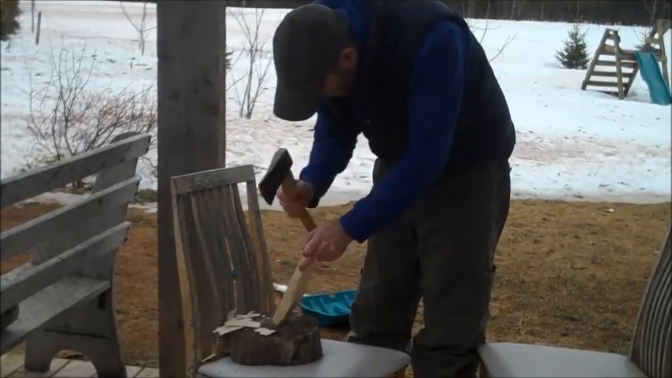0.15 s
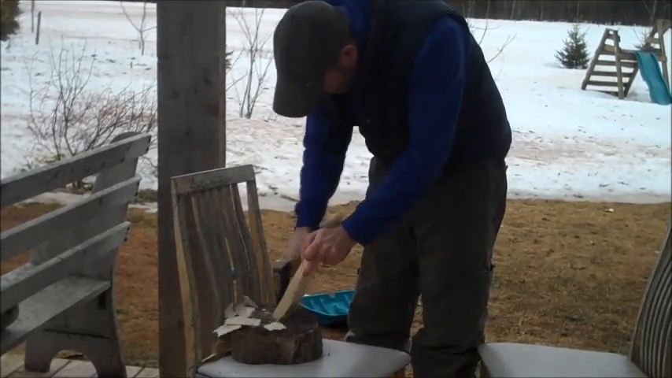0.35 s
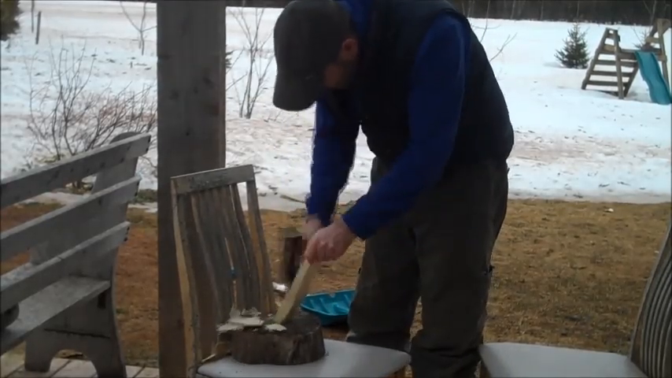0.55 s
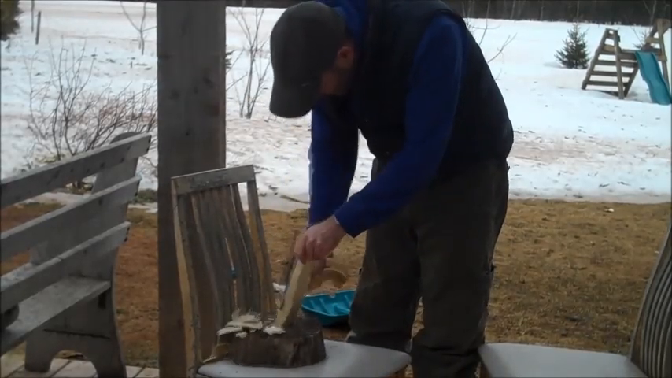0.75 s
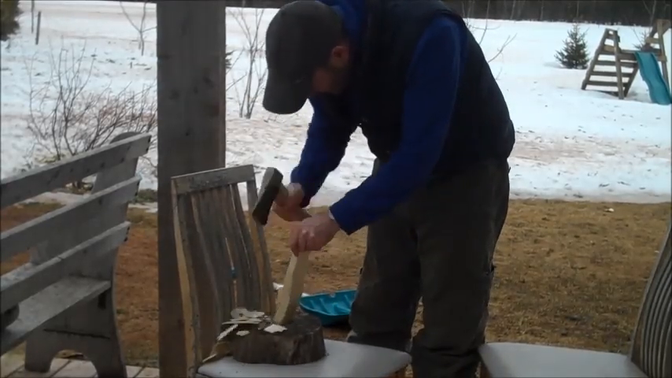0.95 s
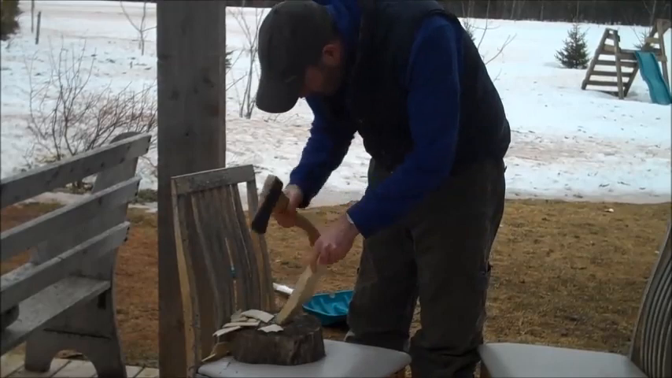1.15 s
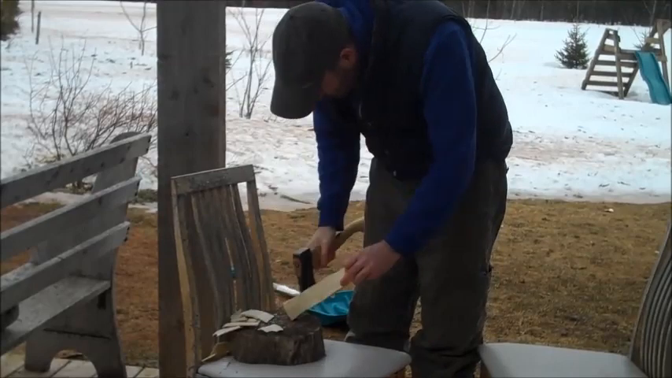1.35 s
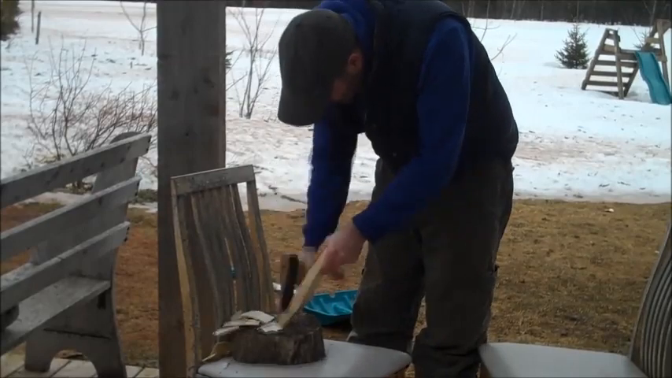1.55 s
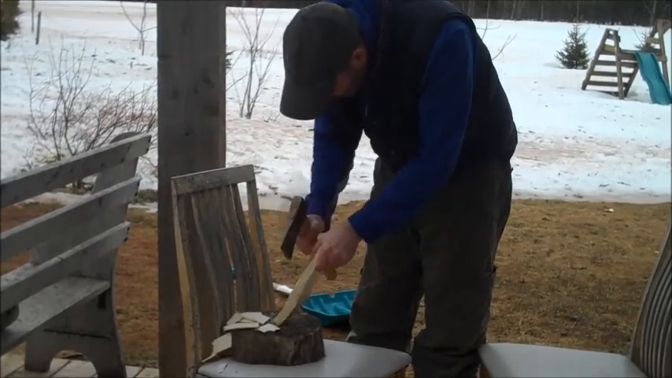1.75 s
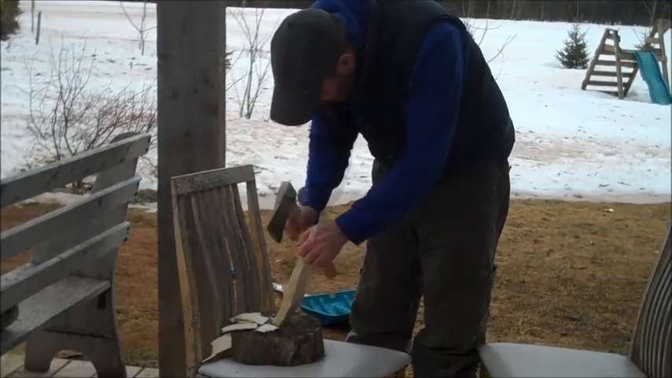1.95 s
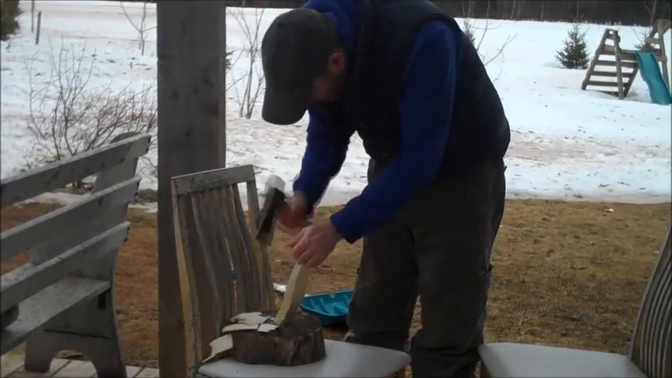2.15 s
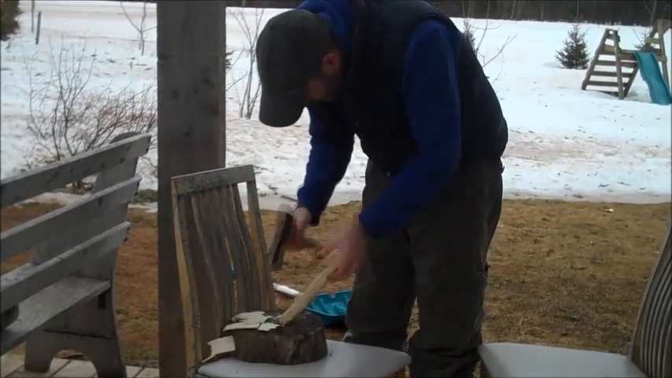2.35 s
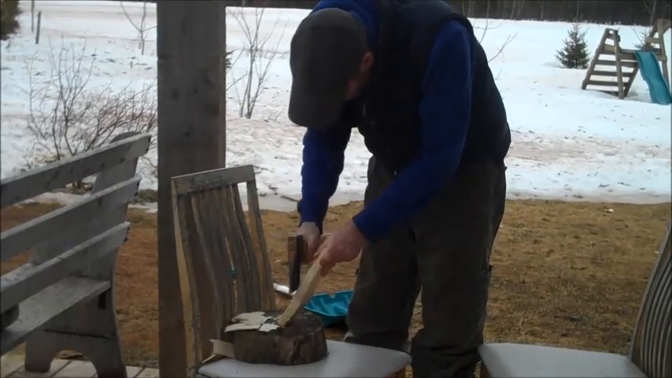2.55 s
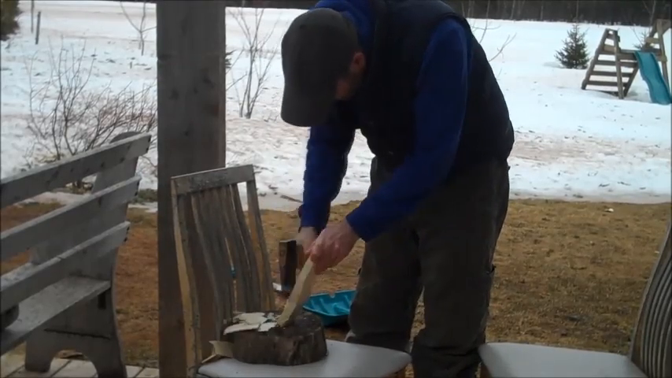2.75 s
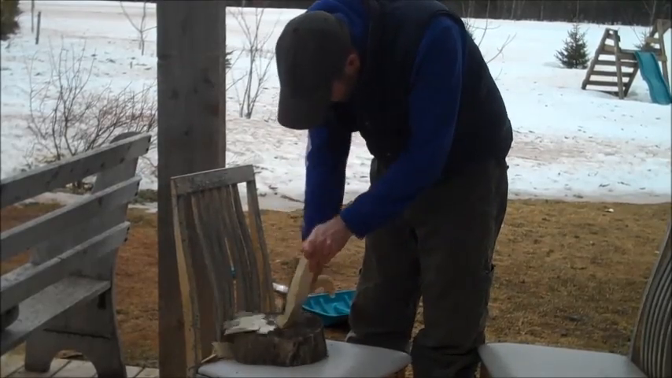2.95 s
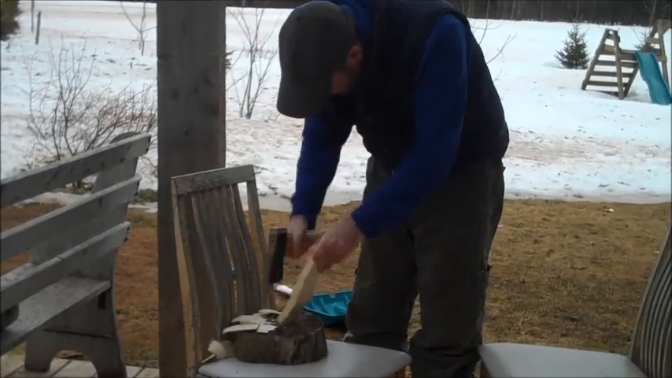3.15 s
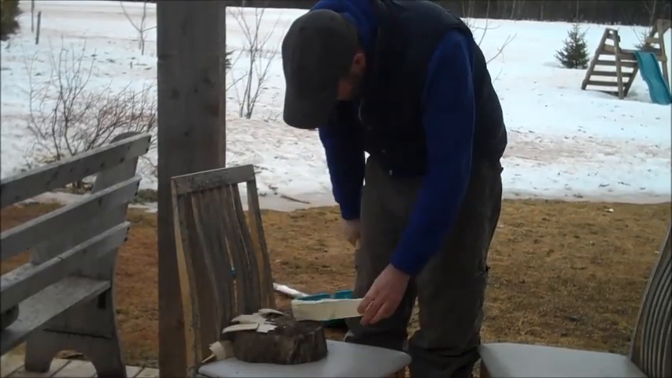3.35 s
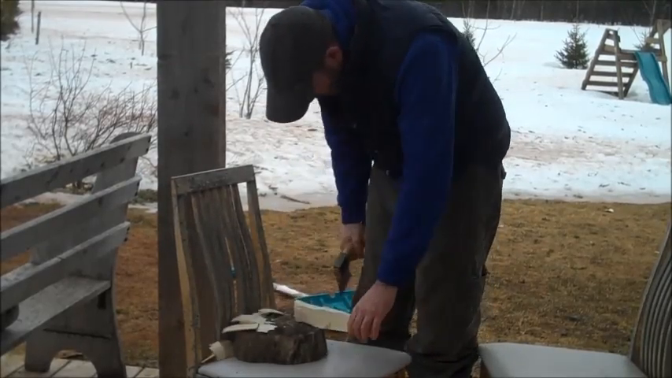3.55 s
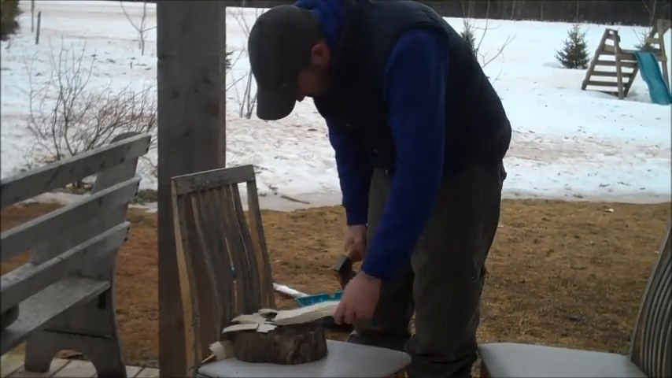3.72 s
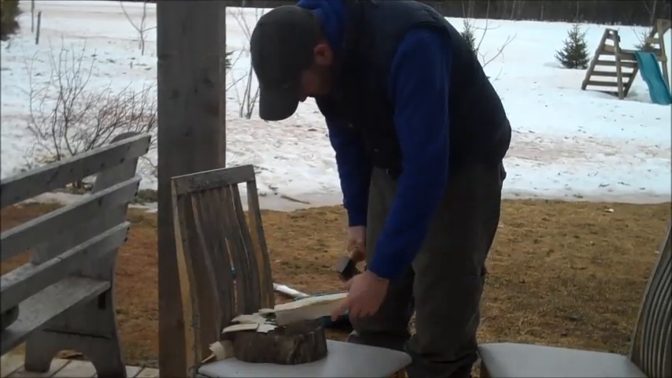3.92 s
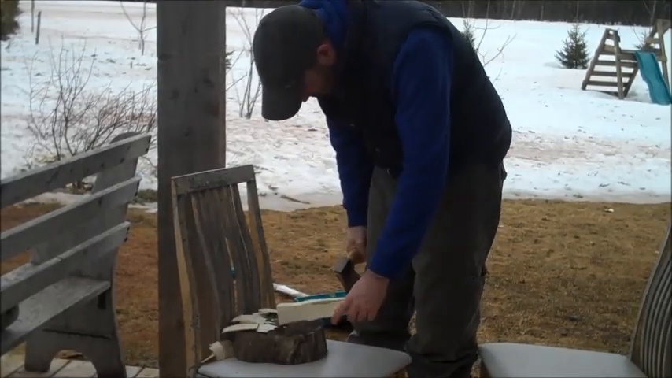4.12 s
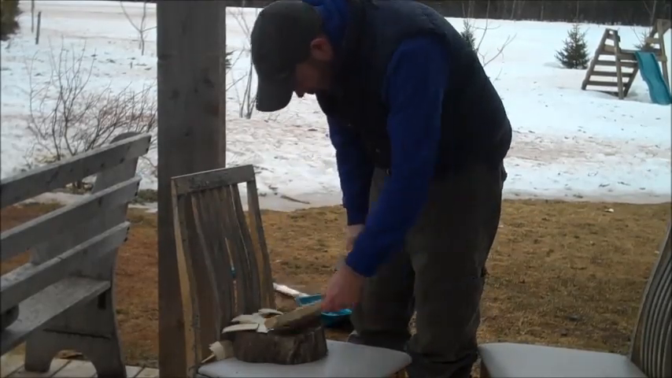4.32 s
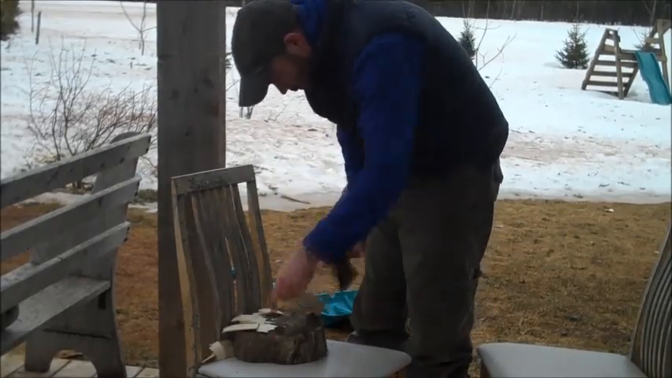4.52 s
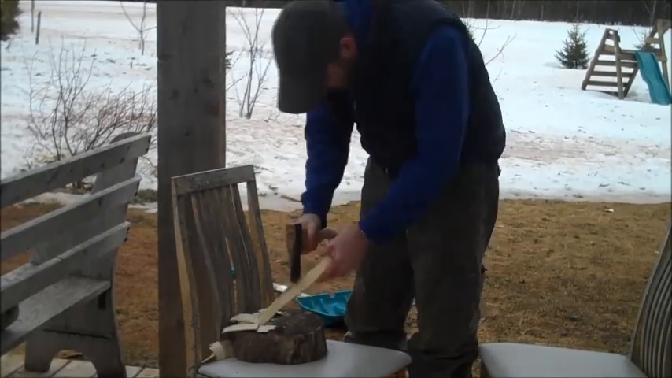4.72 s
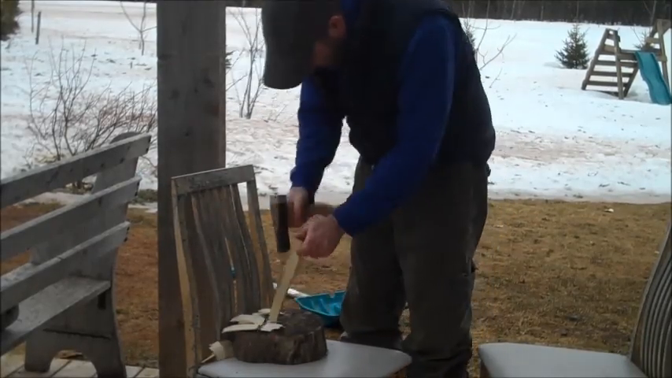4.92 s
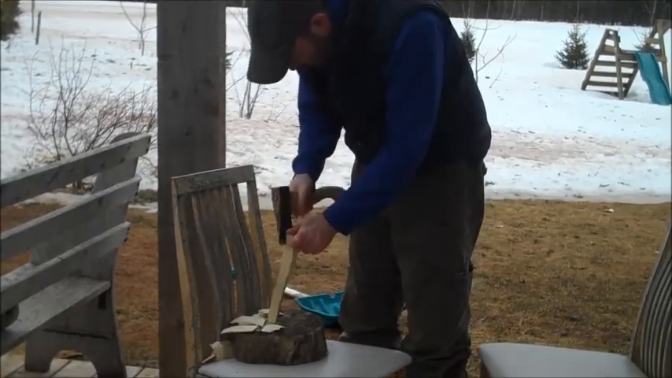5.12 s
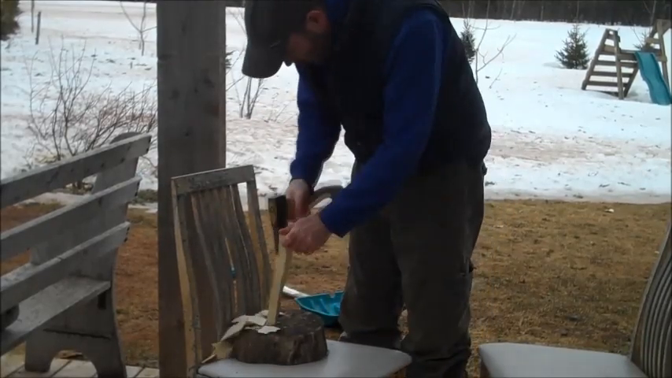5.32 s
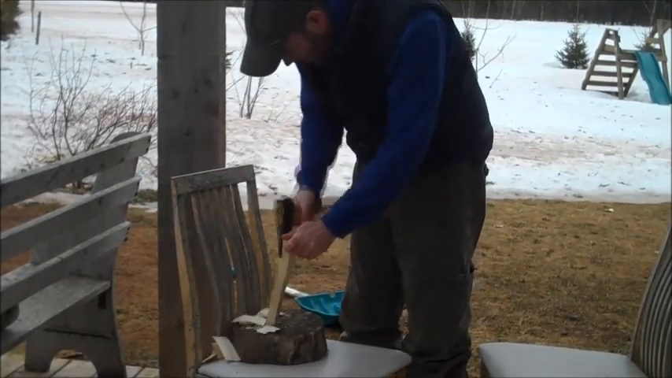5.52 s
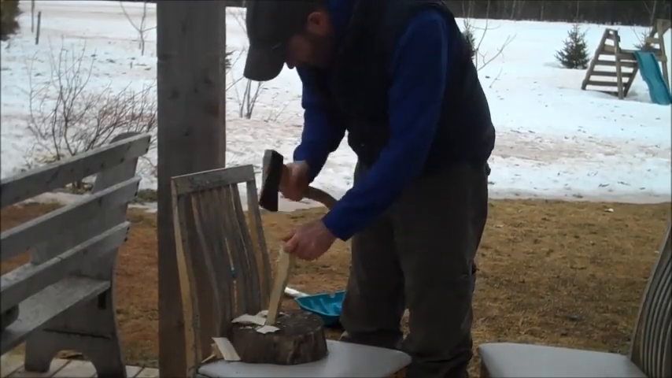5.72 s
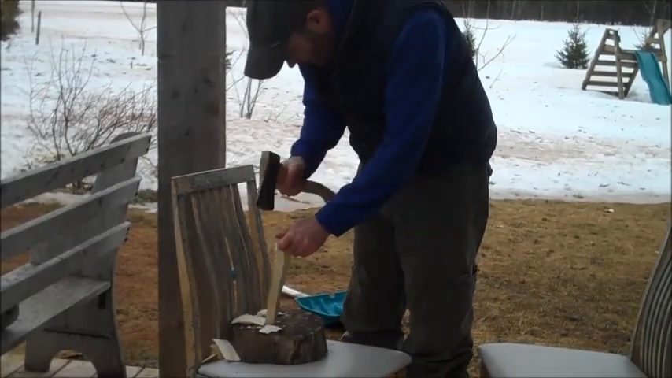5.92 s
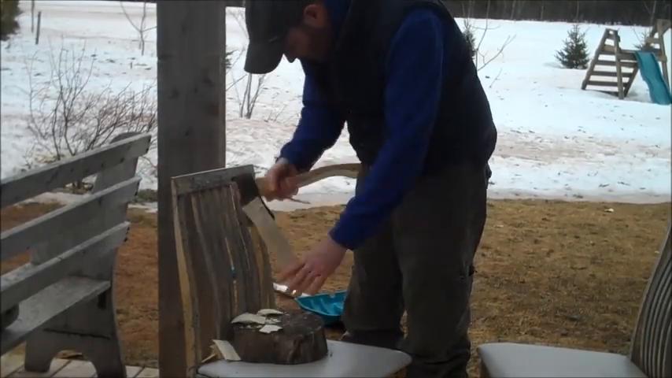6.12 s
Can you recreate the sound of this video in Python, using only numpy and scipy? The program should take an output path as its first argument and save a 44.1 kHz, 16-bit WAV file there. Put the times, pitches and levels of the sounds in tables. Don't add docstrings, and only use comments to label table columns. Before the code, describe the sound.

Quick, crisp chops of an edge into wood, each a hard knock with a torn-fibre crack and a low stump thump, leave a very short porch afterring. Two main bursts and a pause come first, then a softer steady run. Small birds whistle and trill in the yard, chips patter on boards, and cloth brushes faintly. A nearby microphone picks up only a low, light breeze.

```python
import sys
import numpy as np
from scipy import signal
from scipy.fft import rfft, irfft, next_fast_len
from scipy.io import wavfile
from scipy.ndimage import map_coordinates

SR = 44100
rng = np.random.default_rng(int(sys.argv[2]) if len(sys.argv) > 2 else 0)


def magnitude_from_level(level_db):
    exponent = np.asarray(level_db, float) / 20
    return 10 ** exponent


def waveform_to_disk(signal):
    frames = np.transpose(np.atleast_2d(signal))
    scaled = np.clip(frames, -1, 1) * 32767
    samples = np.round(scaled).astype(np.int16)
    wavfile.write(sys.argv[1], SR, samples)


N = 272097
T = np.arange(SR // 6) / SR

# [t/s, bite/s, ring f/Hz, ring level/dB, splinter level/dB]
SIDE_CUTS = [(0.1506, 0.0028, 873, -41, -30.5), (0.2564, 0.0046, 920, -37, -31),
             (0.37, 0.0083, 1168, -30.5, -25.5), (0.6037, 0.0053, 899, -39, -29.5),
             (0.7208, 0.0066, 1138, -29.5, -29.5), (0.8332, 0.0062, 1230, -23.5, -25),
             (0.9556, 0.0051, 1205, -30.5, -27.5), (1.084, 0.011, 1129, -30, -33),
             (1.628, 0.0042, 1526, -35.5, -31), (1.7298, 0.0056, 1432, -27.5, -27),
             (1.8364, 0.0051, 1446, -19.5, -25), (1.969, 0.0033, 1284, -24, -29),
             (2.075, 0.0045, 1387, -34, -34.5), (2.1894, 0.0065, 1104, -39, -24.5),
             (2.3171, 0.0096, 1400, -36.5, -36.5), (2.636, 0.0035, 1454, -34.5, -39),
             (2.7318, 0.0048, 837, -56.5, -29), (2.834, 0.0054, 1417, -22.5, -32),
             (2.94, 0.0049, 1497, -21, -27), (3.052, 0.0073, 1275, -31, -29),
             (3.174, 0.0095, 1018, -26.5, -31.5)]
# [t/s, bite/s, ring f/Hz, ring level/dB, splinter level/dB]
END_CUTS = [(4.4175, 0.0049, 1166, -37.5, -73), (4.471, 0.0031, 1156, -39.5, -77),
            (5.105, 0.0053, 1110, -35.5, -44.5), (5.1978, 0.004, 1413, -27, -39.5),
            (5.291, 0.0067, 1027, -34.5, -42), (5.3966, 0.0083, 1450, -40.5, -40),
            (5.51, 0.0061, 1345, -33.5, -40), (5.6149, 0.0025, 1460, -26, -43),
            (5.7262, 0.0076, 1210, -35, -45), (5.847, 0.0051, 1313, -35, -40.5),
            (5.949, 0.0071, 1283, -31, -38), (6.0658, 0.0055, 1694, -26.5, -30.5)]


def unit(x):
    return x / np.sqrt(np.mean(x ** 2) + 1e-20)


def along(points, hz):
    f, v = np.transpose(points)
    return np.interp(np.log(hz + 1), np.log(f + 1), v)


def filtered(x, response):
    m = next_fast_len(len(x) + 8192)
    return irfft(rfft(x, m) * response(np.fft.rfftfreq(m, 1 / SR)), m)[:len(x)]


def noise(response, size=len(T)):
    return unit(filtered(rng.standard_normal(size), response))


def mode(hz, width_hz):
    return lambda f: 1j * f * width_hz / (hz * hz - f * f + 1j * f * width_hz)


def wobble(rate, size=N):
    knots = rng.standard_normal(int(size * rate / SR) + 4)
    return map_coordinates(knots, [np.arange(size) * rate / SR])


def stroke(rise, fall, bend):
    rise, fall = max(rise, .0004), max(fall, .0004)
    return np.where(T < rise, (T / rise) ** bend, np.exp(-np.abs(T - rise) / fall))


def burst(shape, sound):
    x = shape * sound
    return x * np.linalg.norm(shape) / np.linalg.norm(x)


def add(track, s, sound):
    part = track[round(s * SR):][:len(sound)]
    part += sound[:len(part)]


def latest(rows, s):
    return rows[np.searchsorted([row[0] for row in rows], s) - 1][1:]


def rush(spectrum, level_db, lumps_db, rate):
    flow = noise(lambda f: magnitude_from_level(along(spectrum, f)), size=N)
    return magnitude_from_level(level_db) * unit(magnitude_from_level(lumps_db * wobble(rate)) * flow)


def unrest():
    # [t/s, level/dB]
    strength = [(0.0, -71), (0.6, -69), (1.53, -77), (1.91, -69), (2.2, -68.5), (2.47, -76), (3.06, -69.5),
                (3.45, -76), (4.45, -76.5), (5.82, -74), (6.17, -76)]
    calm_db = -75
    return np.interp(np.arange(N) / SR, *np.transpose(strength)) - calm_db


def hiss(unrest_db):
    # [f/Hz, density level/dB]
    spectrum = [(3000, -33), (7000, -6), (9500, -10), (12000, 1), (14500, -6.5)]
    return rush(spectrum, -81.5 + 0.18 * unrest_db, lumps_db=2.5, rate=97)


def far_wind(unrest_db):
    # [f/Hz, density level/dB]
    spectrum = [(60, -44), (150, -7), (400, 0), (850, 4), (1400, -2), (2500, -13.5), (5000, -28)]
    swell_s, width_s, swell_db = 3.8, .2, 3.5
    swell = swell_db * np.exp(-((np.arange(N) / SR - swell_s) / width_s) ** 2)
    return rush(spectrum, -71.0 - 0.037 * unrest_db + swell, lumps_db=2.0, rate=14)


def low_rumble(unrest_db):
    # [f/Hz, density level/dB]
    spectrum = [(15, 3.5), (50, -7), (120, -12), (250, -17.5), (500, -77)]
    return rush(spectrum, unrest_db - 69.5, lumps_db=2.1, rate=31)


def sleeves(unrest_db):
    # [f/Hz, density level/dB]
    spectrum = [(800, -35), (2000, 1), (3500, 0), (6000, -5), (8000, -7), (11000, -17.5)]
    return rush(spectrum, -75.5 - 0.023 * unrest_db, lumps_db=1.4, rate=55)


def air():
    unrest_db = unrest()
    return low_rumble(unrest_db) + far_wind(unrest_db) + sleeves(unrest_db) + hiss(unrest_db)


def steady_notes():
    # [t/s, length/s, f/Hz, level/dB]
    calls = [(0.981, 0.023, 3180, -60), (1.932, 0.027, 6700, -70), (2.441, 0.058, 3670, -76),
             (2.478, .012, 8060, -73), (2.88, 0.056, 7460, -80), (2.992, .028, 6530, -77.5),
             (3.855, .03, 13150, -80), (4.387, 0.038, 2390, -73), (4.447, 0.053, 7300, -68.5),
             (4.519, 0.042, 2300, -67), (4.58, 0.022, 7300, -65.5), (5.87, 0.012, 3840, -61)]
    return [(s, length, hz, hz, db, -28) for s, length, hz, db in calls]


def husky_calls():
    # [t/s, f/Hz, level/dB, overtone level/dB]
    calls = [
        (1.757, 5600, -57, -10),
        (3.485, 6060, -53.5, -2.5),
        (4.813, 6260, -52.5, -12),
        (5.259, 6380, -56, 0),
        (5.991, 6080, -51, -3.5),
    ]
    length_s, fall = 0.0158, .07
    return [(s, length_s, hz, (1 - fall) * hz, db, overtone_db) for s, hz, db, overtone_db in calls]


def chirps():
    # [t/s, level/dB]
    runs = [(.049, -72), (1.714, -65.5), (1.764, -60.5), (1.8, -59.5), (1.865, -64), (4.044, -62.5),
            (4.081, -59), (4.137, -63), (4.171, -63.5), (4.199, -59), (4.228, -53.5), (4.261, -54),
            (4.63, -66.5), (5.696, -64), (5.756, -61), (5.8, -61), (5.831, -60)]
    length_s, start_hz, end_hz = .019, 3800, 3520
    return [(s, length_s, start_hz, end_hz, db, -29) for s, db in runs]


def song():
    # [t/s, upsweep level/dB, whistle level/dB]
    pairs = [
        (.489, -69, -57.5),
        (0.588, -58, -48.5),
        (.674, -50.5, -48.5),
        (3.733, -63, -55),
        (3.824, -57, -54),
        (3.914, -57, -53),
    ]
    # [lag/s, length/s, start f/Hz, end f/Hz]
    whistles = [
        (.028, .032, 4490, 4420),
        (.026, .039, 4390, 4340),
        (.022, .011, 3980, 4050),
    ]
    # [t/s, first gap/s, hurry/s, level/dB]
    trills = [
        (.748, .0268, 0.0001, -55.5),
        (3.963, 0.0285, .0004, -61),
    ]
    trill_counts = [6, 10]
    # [t/s, long note level/dB, last note level/dB]
    closes = [
        (0.895, -60.5, -50),
        (4.205, -63.5, -63),
    ]
    trill_s, trill_hz, sag_hz, fade_db = 0.011, 6005, 26, 0.6
    last_lag_s = .118

    rows = []
    for (s, up_db, whistle_db), (lag, *whistle) in zip(pairs, whistles + whistles):
        rows.append((s, 0.015, 6350, 7420, up_db, -37))
        rows.append((s + lag, *whistle, whistle_db, -34))
    for (s, gap, hurry, db), count in zip(trills, trill_counts):
        for k in range(count):
            hz = trill_hz - sag_hz * k
            level_db = db - fade_db * k + 2.6 * rng.standard_normal()
            overtone_db = -14 + 3 * rng.standard_normal()
            rows.append((s + k * gap - k * k * hurry, trill_s, hz - 40, hz, level_db, overtone_db))
    for s, long_db, last_db in closes:
        rows.append((s, .105, 3210, 3235, long_db, -31))
        rows.append((s + last_lag_s, .019, 4020, 3860, last_db, -31))
    return rows


def birds():
    out = np.zeros(N)
    for s, length, start_hz, end_hz, db, overtone_db in song() + chirps() + husky_calls() + steady_notes():
        u = np.clip(T / length, 0, 1)
        holds = overtone_db > -13 and end_hz < start_hz
        left = 1 - u ** 6 if holds else (1 - u) ** 3
        pitch = end_hz + (start_hz - end_hz) * left
        husk = (0.2 + 0.9 * magnitude_from_level(overtone_db)) * wobble(500, size=len(T))
        phase = 2 * np.pi * np.cumsum(pitch) / SR + husk
        shape = np.abs(np.sin(np.pi * u)) ** 0.52 * magnitude_from_level(2.5 * wobble(165, size=len(T)))
        tone = np.sin(phase) + magnitude_from_level(overtone_db) * np.sin(2 * phase)
        add(out, s, magnitude_from_level(db + 2.0) * shape * tone)
    trees = rng.standard_normal(len(T)) * magnitude_from_level(-60 * T / 0.15)
    return out + magnitude_from_level(-11.0) * signal.fftconvolve(out, trees / np.linalg.norm(trees))[:N]


def rubs():
    # [t/s, length/s, level/dB, centre f/Hz]
    strokes = [
        (0.416, 0.078, -69.5, 2500),
        (1.098, 0.21, -74.5, 1970),
        (2.333, 0.2, -72, 2500),
        (3.419, 0.21, -71, 3740),
        (4.295, 0.13, -61, 4100),
        (4.866, 0.12, -74.5, 4500),
        (5.047, 0.14, -77, 4970),
        (5.862, 0.067, -70.5, 4500),
    ]
    out = np.zeros(N)
    for s, length, db, hz in strokes:
        size = round(length * SR)
        slips = magnitude_from_level(1.7 * wobble(150, size=size))
        grain = slips * noise(lambda f: mode(hz, 1.8 * hz)(f) ** 2, size=size)
        add(out, s, magnitude_from_level(db) * np.hanning(size) ** 0.43 * grain)
    return out


def chips():
    # [t/s, peak
    # level/dB, centre f/Hz, fizz level/dB]
    tick_rows = [(0.3244, -40, 2550, 6), (0.4465, -30, 2630, -25), (1.003, -36, 3845, -25),
                 (1.309, -23.5, 2900, -5), (1.4337, -34, 4260, -36.5), (1.614, -32.5, 2720, -6),
                 (1.924, -39, 5040, -17), (2.0094, -37, 2660, 4), (2.233, -31, 1500, -12.5),
                 (2.395, -35.5, 1590, -0.5), (3.4825, -34.5, 4200, -19), (3.589, -39, 2840, -15),
                 (3.9338, -34.5, 3300, -30), (4.7337, -48, 1500, 14), (4.7935, -33.5, 2700, 8.5),
                 (4.814, -31.5, 3970, -24), (4.9122, -42, 2690, -17), (4.9477, -40, 2740, 4),
                 (5.258, -30, 3570, -17), (5.3387, -37, 1660, 3), (5.4879, -32.5, 2900, 6),
                 (5.9956, -31, 5370, -16)]
    # [t/s, crackle level/dB, knock over it/dB, t60/s]
    knock_rows = [
        (0.4605, -48, -1.5, 0.036),
        (0.4885, -55, 11, 0.029),
        (0.926, -61, 13, .017),
        (1.1296, -32.5, -19, 0.058),
        (1.1591, -63.5, 18, 0.091),
        (1.219, -53, 2.5, .038),
        (2.3593, -34.5, -11, 0.089),
        (3.132, -65, 15.5, .03),
        (4.437, -58, 16, 0.029),
        (5.9293, -33.5, -13, 0.055),
    ]
    ticks = [(s, db, hz, -60.5 - db, fizz_db, 0.05) for s, db, hz, fizz_db in tick_rows]
    knocks = [(s, db, 1840, knock_db, 4, t60) for s, db, knock_db, t60 in knock_rows]
    out = np.zeros(N)
    for s, db, hz, knock_db, fizz_db, t60 in sorted(ticks + knocks):
        shape = (1 - np.exp(-T / 0.00035)) * magnitude_from_level(-60 * T / max(t60, .005))
        crackle = noise(lambda f: mode(hz, 1.2 * hz)(f) ** 2)
        knock = magnitude_from_level(knock_db + 18.5) * noise(lambda f: mode(700, 1100)(f) ** 2)
        fizz = magnitude_from_level(fizz_db - 9.5) * noise(lambda f: mode(9500, 9000)(f) ** 2)
        add(out, s, magnitude_from_level(db - 24.5) * shape * (crackle + knock + fizz))
    return out


def splinters(rows, width, rise, fall):
    out = np.zeros(N)
    for s, hz, db in rows:
        contact = noise(lambda f: mode(hz, width * hz)(f) ** 2)
        add(out, s, magnitude_from_level(db) * burst(stroke(rise, fall, bend=1), contact))
    return out


def pings():
    # [t/s, f/Hz, level/dB]
    call_pings = [
        (1.311, 4600, -47.5),
        (1.431, 5300, -54),
        (1.437, 6600, -57.5),
        (3.482, 2570, -54.5),
        (4.825, 3800, -62.5),
        (4.912, 2720, -63),
        (5.268, 3700, -59),
        (5.628, 5230, -54),
    ]
    return splinters(call_pings, 0.099, 0.0014, 0.0062)


def rebounds():
    # [t/s, f/Hz, level/dB]
    contacts = [
        (1.637, 1100, -44),
        (2.331, 1130, -37),
        (2.373, 2500, -56.5),
        (3.183, 800, -33),
        (4.429, 1150, -50),
        (5.106, 750, -38.5),
        (5.301, 1200, -45),
        (5.522, 1100, -38.5),
        (5.738, 1200, -42),
        (5.858, 1200, -41),
    ]
    return splinters(contacts, 0.56, .0015, 0.0045)


def tears():
    # [t/s, f/Hz, level/dB]
    fractures = [
        (1.9745, 9000, -46),
        (2.9455, 8000, -43),
        (2.9485, 3240, -36.5),
        (5.6225, 9000, -52),
        (6.0735, 9000, -48),
    ]
    return splinters(fractures, 2.1, 0.0014, 0.0026)


def jolt(hz):
    t60 = min(0.08, 11.2 / hz)
    return np.sin(2 * np.pi * hz * T) * (1 - np.exp(-T / 0.0059)) * magnitude_from_level(-60 * T / t60)


def deck():
    # [t/s, level/dB, f/Hz]
    pushes = [(0.0495, -44, 40), (0.155, -43, 200), (.26, -36.5, 170), (0.372, -38, 141),
              (.4905, -46.5, 45), (.606, -50, 150), (.722, -42, 50), (.724, -47, 170), (1.0505, -42.5, 40),
              (1.1925, -43, 60), (1.63, -35, 230), (1.732, -44, 150), (1.846, -47.5, 90), (1.9405, -53, 35),
              (2.184, -34, 74), (2.187, -36.5, 170), (2.3255, -45, 110), (2.637, -40, 240),
              (2.639, -33, 383), (2.7415, -53, 130), (3.054, -41, 200), (3.177, -33, 220),
              (3.2705, -50, 90), (5.105, -46, 180), (5.2, -45, 260), (5.293, -44.5, 150), (5.4, -48.5, 140),
              (5.616, -37, 260), (5.73, -45, 220), (5.85, -47, 520), (5.951, -46, 150), (6.068, -40, 190)]
    out = np.zeros(N)
    for s, db, hz in pushes:
        add(out, s, magnitude_from_level(db) * jolt(hz))
    return out


def rings(rows, rise, t60, level_db):
    drift_rad, drift_s = 0.69, 0.0088
    out = np.zeros(N)
    shape = (1 - np.exp(-(T / rise) ** 2)) * magnitude_from_level(-60 * T / t60)
    stops = np.array([s + bite for s, bite, *_ in SIDE_CUTS + END_CUTS])
    for s, hz, db in rows:
        since = T + s - stops[np.argmin(np.abs(stops - s))]
        drift = drift_rad * np.tanh(np.abs(since) / drift_s) * wobble(180, size=len(T))
        add(out, s, magnitude_from_level(db + level_db) * shape * np.sin(2 * np.pi * hz * since + drift))
    return out


def stump_rings():
    # [t/s, f/Hz, level/dB]
    modes = [(0.1506, 590, -44.5), (0.1506, 870, -44.5), (0.1529, 388, -36.5), (0.2572, 335, -33),
             (0.3775, 418, -34.5), (0.3806, 820, -41), (0.7312, 410, -39.5), (0.8344, 620, -36),
             (0.837, 336, -34), (0.9611, 381, -41), (1.0895, 820, -39), (1.0919, 357, -38),
             (1.094, 637, -38), (1.6289, 350, -34.5), (1.732, 634, -36), (1.7338, 280, -36),
             (1.7343, 990, -37), (1.7368, 834, -41.5), (1.8375, 625, -36.5), (1.969, 900, -39.5),
             (1.9711, 660, -39.5), (2.0764, 684, -48), (2.1893, 287, -44), (2.193, 970, -45),
             (2.1958, 454, -38.5), (2.3178, 630, -35), (2.3264, 824, -40), (2.6375, 379, -38),
             (2.7369, 436, -40.5), (2.738, 813, -46), (2.9401, 680, -36), (3.058, 397, -41),
             (4.418, 315, -55), (4.4186, 837, -45), (4.4715, 562, -45.5), (5.1054, 637, -49),
             (5.1067, 265, -50), (5.109, 980, -46), (5.1975, 730, -47), (5.1983, 545, -42),
             (5.2013, 409.0, -41.5), (5.203, 824, -42), (5.2928, 416, -41), (5.3995, 677, -44),
             (5.5139, 299, -43.0), (5.5207, 944, -48.5), (5.6172, 834, -43.0), (5.6197, 374, -38),
             (5.7289, 465, -60), (5.7309, 990, -47), (5.7313, 250, -49), (5.8504, 947, -49),
             (5.9519, 805, -42.5), (5.9547, 296, -44), (6.0713, 223, -41), (6.0721, 837, -48)]
    return rings(modes, rise=0.0016, t60=0.051, level_db=6.0)


def blank_rings():
    # [t/s, f/Hz, level/dB]
    modes = [(0.2566, 4510, -45), (0.605, 1464, -43), (0.6052, 3220, -42.5), (0.6059, 2730, -39.5),
             (0.7233, 3520, -34.5), (0.8335, 1775, -30.5), (0.8358, 2250, -54), (0.9561, 1200, -42),
             (0.9567, 4700, -48), (0.9576, 1705, -42), (0.9581, 2070, -47.5), (1.0845, 3250, -50),
             (1.0879, 1180, -40), (1.6283, 1750, -39.5), (1.6298, 2684, -40.5), (1.7296, 1160, -36),
             (1.7306, 1475.0, -30), (1.7311, 3140, -41.5), (1.7321, 1890, -52), (1.969, 1384, -34.5),
             (2.075, 5100, -47.5), (2.0778, 2830, -38), (2.1893, 4280, -43), (2.1897, 4970, -38.5),
             (2.1901, 3340, -44), (2.1912, 3050, -46), (2.1948, 4900, -51), (2.1984, 1130, -41),
             (2.3168, 1160, -39.5), (2.3231, 5040, -47.5), (2.7324, 4410, -41.5), (2.835, 1730, -55),
             (3.1757, 1800, -32), (3.1761, 1480, -41), (3.1761, 1686, -38), (3.1771, 2840, -38),
             (5.1063, 2730, -48.5), (5.2922, 1990, -45), (5.2929, 1590, -45.5), (5.3988, 2770, -64),
             (5.4001, 1384, -45.5), (5.511, 2230, -54), (5.5118, 1920, -41.5), (5.6147, 1720, -37),
             (5.6147, 2120, -40), (5.6147, 2780, -44), (5.9492, 4600, -47), (5.9492, 4750, -43),
             (6.0662, 2660, -38.5), (6.0673, 1330, -37), (6.0724, 1170, -42)]
    return rings(modes, rise=0.0019, t60=0.036, level_db=10.5)


def further_rings():
    # [t/s, f/Hz, level/dB]
    modes = [(0.1506, 1810, -49.5), (0.2632, 1200, -43), (0.3705, 2400, -46), (0.3747, 3420, -46),
             (0.3753, 1884, -50), (0.6148, 1248, -46.5), (0.7213, 2700, -45), (0.7227, 3920, -39.5),
             (0.7231, 4610, -42.5), (0.7241, 1790, -45), (0.7267, 2840, -40), (0.9577, 4700, -50),
             (1.0916, 970, -43), (1.0931, 345, -42.5), (1.6285, 950, -49), (1.6304, 4830, -47),
             (1.7321, 3030, -40), (1.8385, 3045, -36.5), (1.9722, 3730, -42), (2.0771, 1505, -46),
             (2.0787, 1740, -48), (2.0787, 2750, -41), (2.1904, 4770, -51), (2.1934, 1420, -46),
             (2.1942, 2660, -44), (2.3215, 1370, -37), (2.7338, 4630, -52), (2.7341, 3460, -54),
             (2.7373, 1276, -52), (2.836, 1740, -46), (2.8378, 395, -40.5), (2.9427, 1226, -33.5),
             (3.0546, 3310, -47), (3.1771, 1460, -42), (3.1814, 427, -36.5), (4.4712, 1765, -54),
             (5.1054, 1590, -46.5), (5.1999, 2750, -40), (5.4011, 1390, -48.5), (5.4012, 1980, -49),
             (5.4034, 368, -49.5), (5.511, 2140, -46), (5.5116, 2610, -56), (5.512, 1140, -47),
             (5.5141, 3480, -50), (5.6147, 1360, -35.5), (5.6147, 2240, -36.5), (5.7268, 4624, -51),
             (5.8477, 1580, -50), (5.9507, 3560, -42), (5.9513, 1480, -36), (5.9554, 458, -44.5)]
    return rings(modes, rise=0.00081, t60=0.037, level_db=9.5)


def porch(sound, t60):
    # [f/Hz, stretch of t60/1]
    stretch = [(200, 1.36), (1000, 1.32), (10000, 0.79)]
    hz, t, z = signal.stft(rng.standard_normal(len(T)), SR, nperseg=128)
    decay = magnitude_from_level(-60 * t / (t60 * along(stretch, hz))[:, None])
    tail = signal.istft(z * decay, SR, nperseg=128)[1]
    echoes = signal.fftconvolve(sound, tail[:len(T)] * (1 - np.exp(-T / 0.003)))[:len(T)]
    return echoes * np.linalg.norm(sound) / np.linalg.norm(echoes)


def ring(hz, rough):
    phase = 2 * np.pi * (hz * T + rng.random()) + 2.36 * rough * wobble(310.5, size=len(T))
    return np.sin(phase) + rough * noise(lambda f: mode(hz, .9 * hz)(f) ** 2)


def fibre_noise():
    # [f/Hz, density level/dB]
    spectrum = [(600, -5), (1500, 0.5), (3000, -10), (5000, 1), (8000, -2.5), (12000, -6.5), (15000, 2.5)]
    snaps = magnitude_from_level(2.7 * wobble(760, size=len(T)))
    return snaps * noise(lambda f: magnitude_from_level(along(spectrum, f)) + .6 * np.abs(mode(2830, 350)(f)))


def stump_thump(bite, hz):
    # [f/Hz, width/Hz, level/dB]
    modes = [(240, 260, -2), (416, 114, 2.5), (619, 240, -2), (980, 420, -4.5)]

    def wood(f):
        return sum((-1) ** k * magnitude_from_level(db) * mode(c, w)(f) for k, (c, w, db) in enumerate(modes))

    struck = ring(hz, 0.4) + 1.01 * noise(wood)
    return burst(stroke(bite + 0.0032, 0.0042, bend=0.75), struck)


def chops():
    # [from t/s, thump f/Hz, thump level/dB]
    stands = [(0, 373, -51), (.2, 330, -34), (.31, 411, -30.5), (.5, 366, -40), (.66, 385, -38),
              (.9, 374, -39), (1.02, 490, -32), (1.5, 348, -31), (1.68, 386, -35), (1.79, 597, -41),
              (2.02, 410, -33.5), (2.26, 592, -35), (2.5, 394, -33.5), (2.79, 526, -37), (3.0, 357, -39),
              (3.12, 301, -32.5), (4, 606, -44.5), (5, 504, -43.5), (5.45, 355, -42.5), (5.67, 364, -46.5),
              (5.9, 350, -39), (6.01, 509, -38)]
    # [from t/s, f/Hz, level/dB]
    grips = [(0, 2770, -30.5), (.2, 2795, -22), (.31, 2917, -30), (.66, 3015, -25), (.78, 2840, -27),
             (1.02, 2800, -32), (1.68, 3132, -27.5), (1.79, 4840, -30), (1.9, 2750, -27),
             (2.03, 2790, -28.5), (2.14, 2855, -33), (2.5, 2910, -28.5), (2.69, 4434, -28.5),
             (2.79, 2980, -36), (3.12, 3306, -28), (4, 1940, -75.5), (5, 3100, -35), (5.15, 2300, -27),
             (5.245, 2610, -37), (5.45, 2840, -30.5), (5.56, 2400, -32.5), (5.79, 2586, -30),
             (6.01, 2200, -25)]
    usual_db = -30
    out = np.zeros(N)
    for s, bite, low_hz, low_db, splinter_db in SIDE_CUTS + END_CUTS:
        stump_hz, stump_db = latest(stands, s)
        high_hz, high_db = latest(grips, s)
        square = low_db - usual_db
        stump_db = stump_db + 0.24 * square
        high_db = high_db + 0.32 * square
        release = 0.0024 * np.exp(-0.03 * square)
        t60 = 0.056 * np.exp(-0.02 * max(square, -12))
        rough = 0.077 + 67.4 * bite
        force = stroke(bite, 0.7 * release + 0.00088, bend=0.0065 / bite)

        low = magnitude_from_level(low_db - 1.0) * burst(force, ring(low_hz, rough))
        high = magnitude_from_level(high_db - 3.5) * burst(force, ring(high_hz, rough))
        fibres = fibre_noise()
        tearing = magnitude_from_level(splinter_db) * burst(force ** 0.95, fibres)
        thump = magnitude_from_level(stump_db - 1.5) * stump_thump(bite, stump_hz)

        spread = noise(lambda f: mode(low_hz, 1.1 * low_hz)(f) ** 2)
        after = magnitude_from_level(low_db - 8.0) * porch(burst(force, spread), t60)
        after = after + magnitude_from_level(high_db - 11.0) * porch(burst(force, ring(high_hz, rough + .5)), t60)
        after = after + magnitude_from_level(-8.5) * porch(tearing + thump, t60)
        ragged = magnitude_from_level(1.2 * wobble(150, size=len(T)))
        push = magnitude_from_level(stump_db - 31.0) * jolt(rng.uniform(80.0, 167))
        add(out, s, low + high + tearing + thump + ragged * after + push)

        graze = burst(stroke(0.0066, 0.00086, bend=2.1), fibres[::-1])
        add(out, s - .008, magnitude_from_level(splinter_db - 29.5) * graze)
    return out


def wall_echo(cuts):
    siding = rng.standard_normal(len(T)) * stroke(0.0383, 0.0038, bend=10.0)
    wall = magnitude_from_level(-36.0) * signal.fftconvolve(cuts, siding / np.linalg.norm(siding))[:N]
    slats = rng.standard_normal(len(T)) * stroke(0.037, 0.004, bend=0.6)
    bright = filtered(cuts, lambda f: mode(6000, 9000)(f) ** 2)
    return wall + magnitude_from_level(-31.0) * signal.fftconvolve(bright, slats / np.linalg.norm(slats))[:N]


def scene():
    around = air() + birds() + rubs() + chips()
    loose = pings() + rebounds() + tears()
    cuts = deck() + stump_rings() + blank_rings() + further_rings() + chops()
    return (around + loose + cuts + wall_echo(cuts))[None]


def band_limit(x):
    return signal.sosfilt(signal.butter(12, 15740, fs=SR, output="sos"), x)


def record(dry):
    top = filtered(dry[0], lambda f: 1 / (1 + (f / 13900) ** 130))
    mix = top + magnitude_from_level(-98) * rng.standard_normal(N)
    return band_limit(mix[None])


dry = scene()
out = record(dry)
waveform_to_disk(out)
```